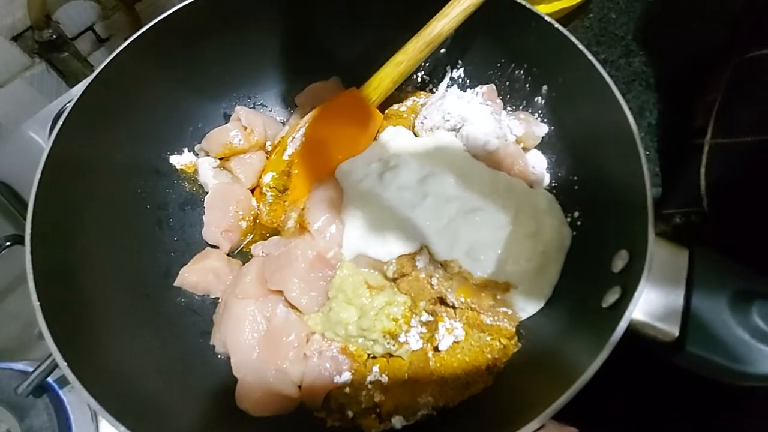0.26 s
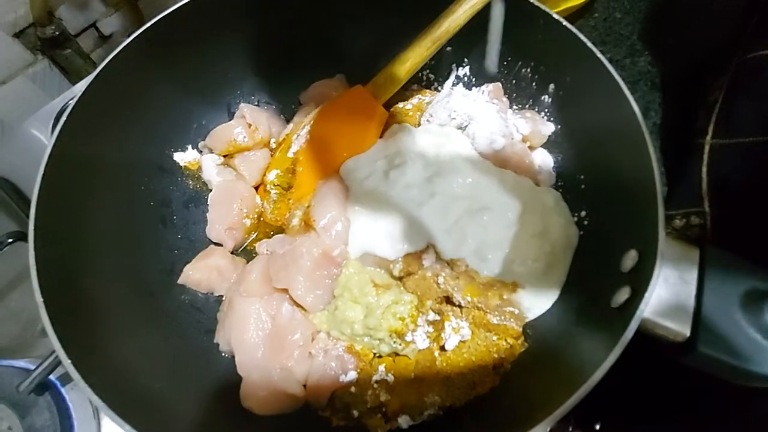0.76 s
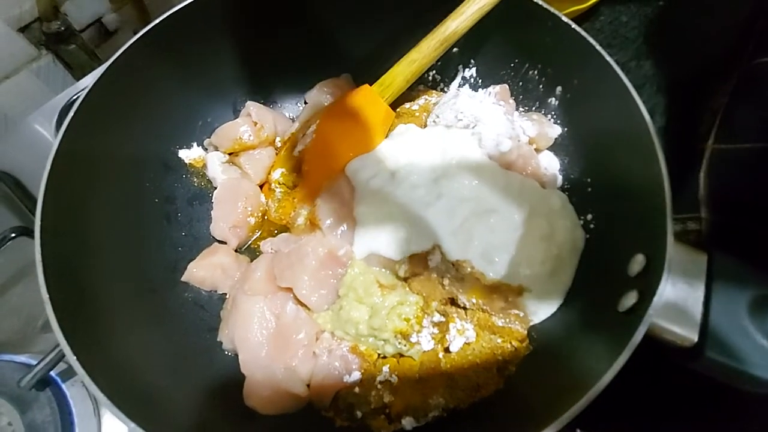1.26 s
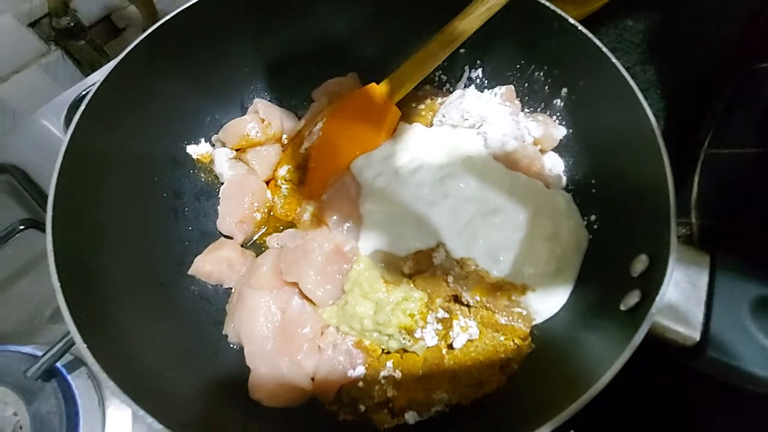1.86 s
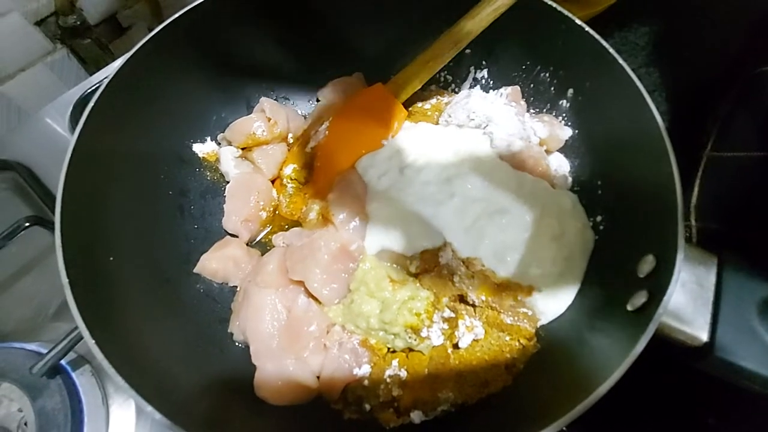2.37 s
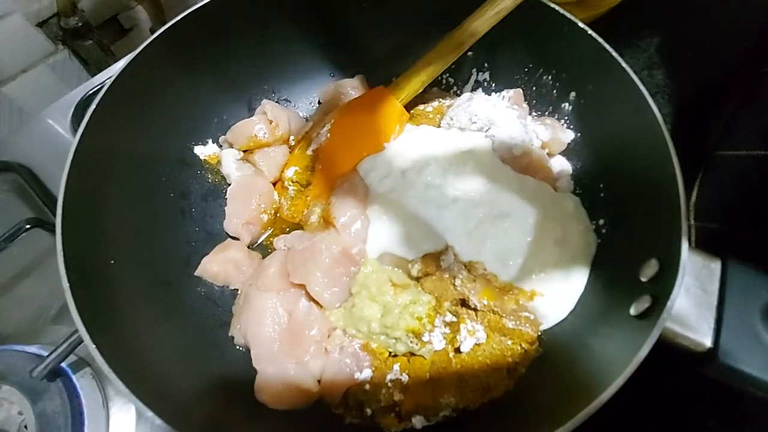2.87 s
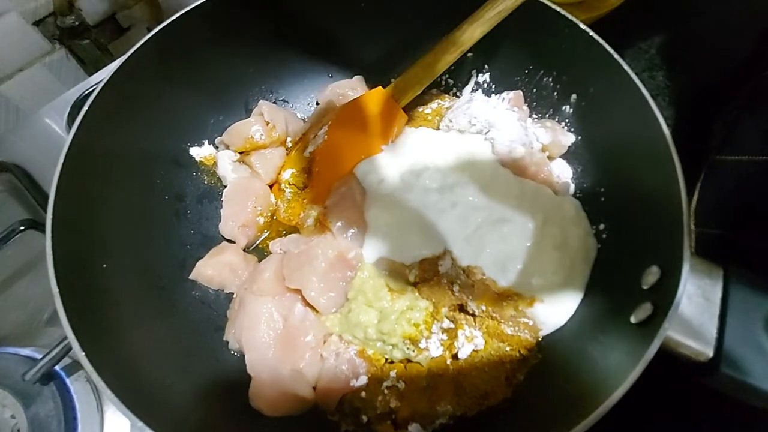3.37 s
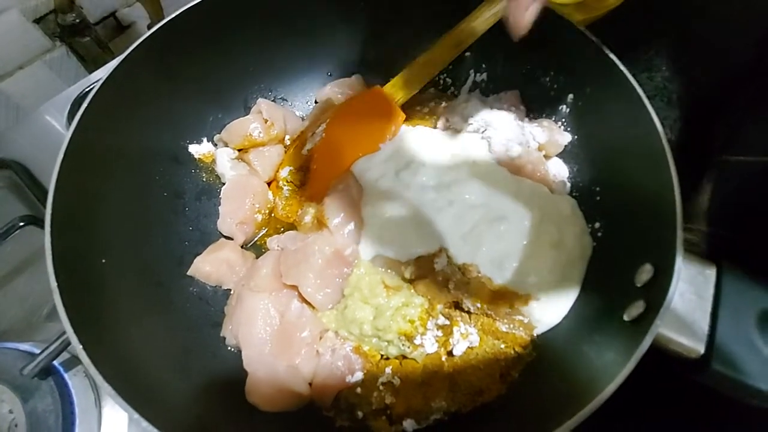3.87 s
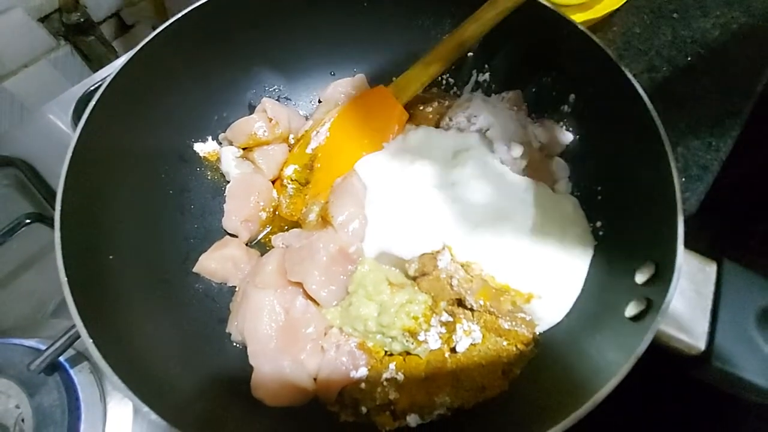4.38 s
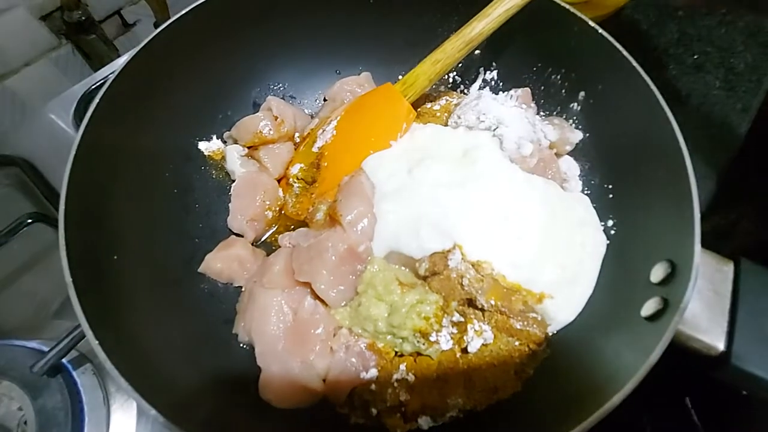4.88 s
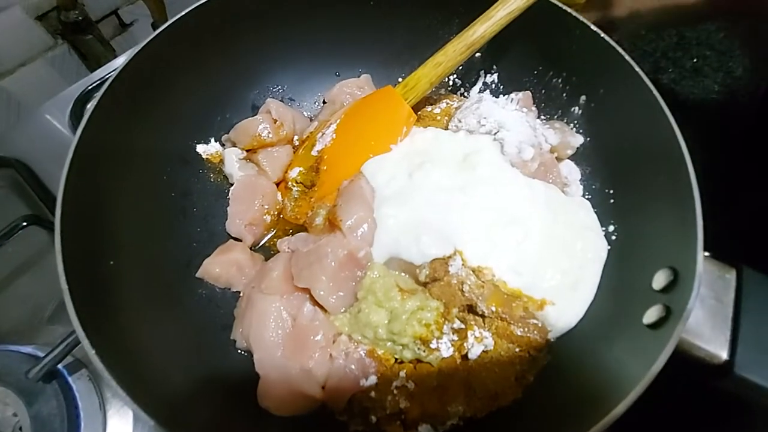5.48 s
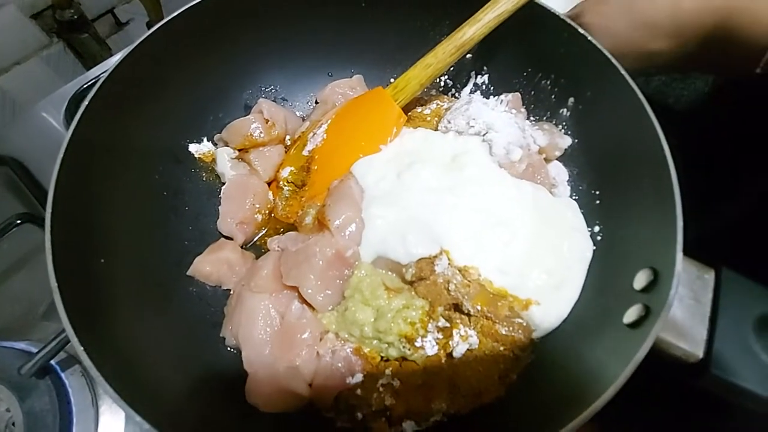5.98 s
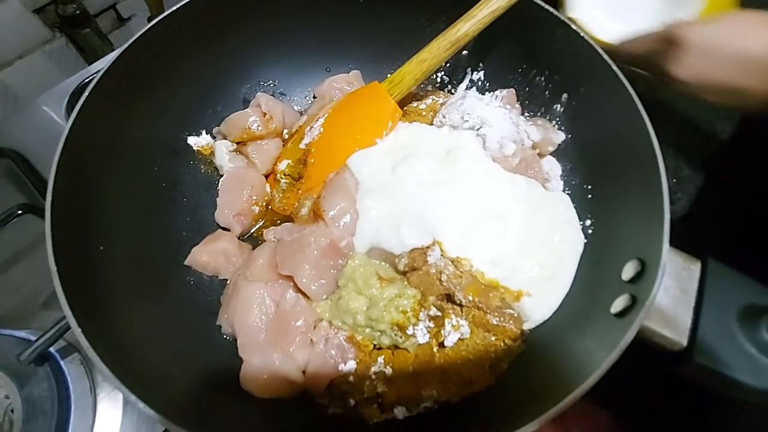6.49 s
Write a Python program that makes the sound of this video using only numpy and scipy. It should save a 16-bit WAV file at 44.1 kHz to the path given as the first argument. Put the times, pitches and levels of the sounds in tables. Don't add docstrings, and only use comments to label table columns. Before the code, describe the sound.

Mostly quiet kitchen handling with faint shuffles, dry rustles and muffled bumps through a stone counter. Midway, a roomy double thud and bright rattle come from a cupboard. A couple of seconds later a light bowl gives a sharp clack, then a dense, very loud flurry of knocks and a brief scrape near the microphone, with wet ticks and dwindling taps. Short hard-room reflections, slight hiss.

```python
import sys
import numpy as np
from scipy import signal
from scipy.fft import rfft, irfft, next_fast_len
from scipy.io import wavfile

SR = 44100
rng = np.random.default_rng(int(sys.argv[2]) if len(sys.argv) > 2 else 0)


def generate_wav(sig):
    pcm = np.round(np.clip(np.atleast_2d(sig).T, -1, 1) * 32767).astype(np.int16)
    wavfile.write(sys.argv[1], SR, pcm)


def ratio_of_db(decibels):
    return 10 ** (np.asarray(decibels, float) / 20)


N = 297407


def at_hz(points, hz):
    table_hz, values = np.transpose(points)
    return np.interp(np.log(hz + 1), np.log(table_hz + 1), values)


def rms_one(x):
    return x / np.sqrt(np.mean(x ** 2) + 1e-30)


def drift(rate_hz, count):
    lowpass = signal.butter(2, rate_hz, fs=SR / 64, output="sos")
    coarse = signal.sosfilt(lowpass, rng.standard_normal((count, N // 64 + 2)))
    return [np.interp(np.arange(N) / 64, np.arange(len(c)), rms_one(c)) for c in coarse]


def swells(rows):
    t = np.arange(0, N + 32, 32) / SR
    s, db, rise_s, fall_s = np.transpose(rows)[:, :, None]
    before = (s - t) / np.maximum(rise_s, 0.002)
    after = (t - s) / np.maximum(fall_s, 0.002)
    level_db = db - 20 * np.where(t < s, before, after)
    return np.interp(np.arange(N) / SR, t, np.sqrt(np.sum(ratio_of_db(level_db) ** 2, axis=0)))


def grains(shape, per_s, spread_db):
    born = rng.random(shape) < per_s / SR
    size_db = spread_db * np.minimum(rng.exponential(1, shape), 4)
    return born * ratio_of_db(size_db) * rng.choice([-1, 1], shape)


def resonance(hz, mode_hz, t60_s):
    r = ratio_of_db(-60 / (t60_s * SR))
    w = 2 * np.pi * mode_hz / SR
    z = np.exp(-2j * np.pi * hz / SR)
    return np.sin(w) * z / (1 - 2 * r * np.cos(w) * z + r * r * z * z)


def causal(spectrum, hz):
    cepstrum = irfft(np.log(ratio_of_db(np.maximum(at_hz(spectrum, hz), -90))))
    half = len(cepstrum) // 2
    fold = np.r_[1, np.full(half - 1, 2), 1, np.zeros(half - 1)]
    return np.exp(rfft(cepstrum * fold))


# (frequency [Hz], correlation [-1..1])
LIKENESS = [(30, .5), (70, .98), (300, .95), (640, .5), (1200, 0.1), (16000, 0)]


def paired(mid, side, hz):
    alike = np.clip(at_hz(LIKENESS, hz), -1, 1)
    return np.sqrt(1 + alike) * mid + np.sqrt(1 - alike) * side * [[1], [-1]]


def stereo_noise(size):
    hz = np.fft.rfftfreq(size, 1 / SR)
    return hz, paired(*rfft(rng.standard_normal((2, size))), hz)


def struck(events, bare, modes, modes_db, per_s, ring_t60_s, pivot_hz):
    size = 16384
    hz, t = np.fft.rfftfreq(size, 1 / SR), np.arange(size // 4) / SR
    rattles = grains((len(events), 2, size // 4), per_s, 2.0)
    luck_db = rng.normal(0, 3.2, (len(events), len(modes)))
    shapes = np.array([ratio_of_db(db) * resonance(hz, mode_hz, t60_s) * (-1) ** k
                       for k, (mode_hz, db, t60_s) in enumerate(modes)])
    colour = causal(bare, hz)
    fade = np.hanning(2 * size)[size:] ** 2
    out = np.zeros((2, N + size))
    for (s, db, tilt_db, rattle_s, ring_hz, ring_db), clicks, strengths_db in zip(events, rattles, luck_db):
        decay = ratio_of_db(-20 * (t / max(rattle_s, 0.001)) ** 1.1)
        push = clicks * np.minimum(t / 0.0023, 1) * decay
        tilt = ((pivot_hz / 8 + 1j * hz) / (8 * pivot_hz + 1j * hz) * 8) ** (tilt_db / 6)
        body = (1 + ratio_of_db(modes_db + strengths_db) @ shapes) * colour * tilt
        ring = resonance(hz, ring_hz, ring_t60_s) * 1j * hz / (ring_hz + 1j * hz) ** 2
        body = body / np.linalg.norm(body) + ratio_of_db(ring_db) * ring / np.linalg.norm(ring)
        hit = irfft(paired(*rfft(push, size), hz) * body) * fade
        at = round(s * SR)
        out[:, at:at + size] += ratio_of_db(db) * hit / np.abs(hit.mean(axis=0)).max()
    return out[:, :N]


# (time [s], peak [dB], push [s], favoured ring [Hz])
BUMPS = [(0.0, -39, 0.088, 330), (0.704, -44, 0.02, 320), (0.751, -44.5, 0.015, 320),
         (1.105, -33, 0.036, 310), (1.16, -40, 0.05, 90), (1.29, -48.5, 0.014, 78.5),
         (1.635, -40, 0.06, 150), (1.696, -36, 0.0042, 175), (1.754, -30, 0.016, 125),
         (2.28, -52, 0.03, 200), (2.614, -47, 0.017, 233), (3.305, -20.5, 0.075, 243),
         (3.34, -24.5, 0.0068, 178), (3.404, -21.5, 0.018, 137), (3.42, -21.5, 0.01, 201),
         (3.497, -41, 0.028, 138), (3.688, -33.5, 0.03, 154), (3.707, -21, 0.02, 142),
         (3.775, -30.5, 0.025, 257), (5.249, -37, 0.058, 403), (5.652, -23.5, 0.094, 320),
         (5.699, -22.5, 0.014, 335), (6.059, -42, 0.014, 514), (6.175, -35, 0.037, 331),
         (6.452, -29, 0.02, 280)]
# (frequency [Hz], level [dB], t60 [s])
COUNTER = [(58, -23.5, 0.35), (125.7, -3, 0.14), (183.8, -3, 0.093), (227.2, -0.5, 0.12), (320, -5.5, 0.24),
           (384.6, -8.5, 0.1), (483, -2, 0.084)]
# (frequency [Hz], density [dB per Hz])
PUSH = [(30, -40), (90, -3.5), (150, -4), (350, -2), (600, -9.5), (1200, -28), (4000, -55), (20000, -101)]


def counter_bumps():
    rows = [(s, db, 2.5 + 10 * np.log2(hz / 255), push_s, hz, -2.5) for s, db, push_s, hz in BUMPS]
    return struck(rows, PUSH, COUNTER, modes_db=-40, per_s=1600, ring_t60_s=0.065, pivot_hz=254)


# (peak time [s], level [dB], rise over 20 dB [s], fall over 20 dB [s])
RUBS = [(0.0, -32, .03, 0.062), (0.158, -56, 0.044, .015), (0.278, -59, .035, 0.011),
        (0.444, -39, 0.087, 0.42), (0.752, -39, 0.026, 0.028), (0.902, -56, 0.13, 0.12),
        (2.87, -54.5, 0.19, 0.34), (5.69, -1, 0.016, 0.09), (5.74, -15, 0.021, 0.15),
        (5.776, -5, 0.078, 0.013), (6.275, -48, 0.027, 0.06), (6.32, -37, 0.06, 0.05),
        (6.405, -36, 0.03, 0.05), (6.368, -31.5, 0.058, 0.2), (6.57, -39, 0.04, 0.031),
        (6.448, -26, .016, 0.042), (6.518, -35, 0.016, 0.085)]
# (frequency [Hz], level [dB], t60 [s])
BOWL = [(640, -21, 0.022), (830, -4.5, 0.02), (1294, 4, 0.036), (1600, 13, 0.0057), (1930, -2, 0.069),
        (2100, 4.5, 0.0047), (2465, -17, 0.22), (2870, -6, 0.045), (3170, -21.5, 0.038), (3483, 6, 0.0088),
        (3950, -27.5, 0.12), (4480, -36, 0.013), (5390, -16, 0.11), (6800, -13, 0.025)]
# (frequency [Hz], density [dB per Hz])
CRACK = [(60, -31), (150, -34), (300, -18), (600, -13.5), (1000, -13.5), (1400, -8.5), (2500, -0.5),
         (4200, -5.5), (5000, -12), (6400, -15.5), (8000, -28.5), (11000, -24.5), (15800, -36.5)]


def rubbing():
    slips_per_s, modes_db, wander_db = 3600, -33, 5.0
    slips = swells(RUBS) * grains((2, N), slips_per_s, 0.71) / np.sqrt(slips_per_s / SR)
    rung = slips + 1e-18
    for (mode_hz, db, t60_s), wander in zip(BOWL, drift(21.8, len(BOWL))):
        r = ratio_of_db(-60 / (0.5 * t60_s * SR))
        w = 2 * np.pi * mode_hz / SR
        drive = slips * ratio_of_db(db + modes_db + wander_db * wander) + 1e-18
        rung = rung + signal.lfilter([0, np.sin(w)], [1, -2 * r * np.cos(w), r * r], drive)
    size = next_fast_len(N)
    hz = np.fft.rfftfreq(size, 1 / SR)
    spectrum = paired(*rfft(rung, size), hz) * ratio_of_db(at_hz(CRACK, hz))
    return ratio_of_db(-8.0) * irfft(spectrum, size)[:, :N]


def flickering(spectrum, flicker_db, count):
    size = next_fast_len(N)
    hz, noise = stereo_noise(size)
    noise = noise * ratio_of_db(at_hz(spectrum, hz))
    inner_hz = np.geomspace(spectrum[1][0], spectrum[-2][0], count + 1)[1:-1]
    edges_hz = np.r_[0, inner_hz, SR]
    patches = 0
    for low, high, own in zip(edges_hz, edges_hz[1:], drift(6.8, count)):
        band = irfft(noise * (hz >= low) * (hz < high), size)[:, :N]
        patches = patches + band * ratio_of_db(flicker_db * own)
    return rms_one(patches)


# (time [s], hiss level [dB])
GATE = [(0.0, -55), (0.4, -54), (0.6, -68.5), (0.92, -70), (1.5, -80), (1.78, -68.5), (1.97, -82.5),
        (2.29, -72.5), (2.42, -82), (2.7, -74), (2.87, -82), (3.5, -72.5), (4.0, -78.5), (4.96, -77.5),
        (5.39, -66), (5.94, -73.5), (6.4, -72), (6.74, -83.5)]
# (peak time [s], rumble level [dB], rise [s], fall [s], air above rumble [dB])
SHUFFLES = [(0.11, -51, 0.12, 0.88, -6), (0.4, -50.5, 0.12, 0.49, -5.5), (0.85, -63.5, 0.11, 0.58, 3),
            (1.16, -59, 0.46, 0.17, -7.5), (1.717, -52, 0.11, 0.34, -7.5), (2.75, -75, 0.32, 1, -25),
            (3.28, -70, .1, 0.044, -16.5), (3.49, -50.5, 0.35, 0.17, -1), (3.799, -52.5, 0.25, 0.1, 1.5),
            (4.3, -64, 0.6, 1, -12), (5.15, -78.5, 1, .3, 5.5), (5.39, -65, 0.26, .5, 7.5),
            (5.831, -50.5, 0.067, 0.078, 10), (5.99, -60, 0.035, 0.061, -25), (6.4, -65, 0.36, 0.074, 15.5)]
# (peak time [s], level [dB], rise [s], fall [s])
RUSTLES = [(0.742, -63.5, 0.0076, 0.056), (0.974, -62.5, .008, 0.054), (1.136, -63, .006, 0.022),
           (1.334, -69.5, 0.0097, 0.035), (1.501, -76, 0.008, 0.15), (1.762, -72, 0.0048, 0.023),
           (2.28, -65.5, 0.14, 0.13), (2.601, -67.5, .02, 0.11), (3.077, -76.5, 0.0064, 0.14),
           (4.029, -84, 0.024, 0.031), (4.09, -86, 0.024, 0.034), (4.336, -67, .01, 0.038),
           (4.568, -73, 0.0074, 0.058), (4.67, -67.5, 0.0088, 0.079), (4.907, -73, 0.0068, 0.075),
           (5.224, -49, 0.0087, 0.11), (5.5, -71.5, 0.24, 0.17), (5.65, -52.5, 0.013, 0.069),
           (5.974, -54, 0.011, 0.068), (6.09, -61, 0.088, 0.1), (6.2, -69, 0.062, 0.13),
           (6.45, -67.5, 0.21, 0.087)]
# (frequency [Hz], density [dB per Hz])
RUMBLE = [(15, -68), (25, -7), (53, -14), (241, -1.5), (357, -2.5), (446, -5), (566, -9), (764, -10.5),
          (1100, -29.5), (1430, -45.5), (2420, -120)]
AIR = [(530, -60), (900, -15), (1000, -8.5), (1170, -5.5), (1630, -2.5), (1960, 0), (2290, -1), (2820, -1),
       (3990, -0.5), (5550, -13.5), (6500, -19), (8450, -40.5), (14300, -120)]
HISS = [(2820, -6), (4800, 2.5), (6110, 0), (8370, -3), (11400, 4.5), (15000, 0), (15900, -17)]
HUM = [(12, -53.5), (20, -22), (38, 1.5), (76, -7.5), (113, -6.5), (130, -9.5), (170, -47), (290, -120)]


def room_floor():
    gate_s, gate_level_db = np.transpose(GATE)
    gate_db = np.interp(np.arange(N) / SR, gate_s, gate_level_db)
    rumble = ratio_of_db(-71.5 + 0.17 * (gate_db + 66.5)) + swells([row[:4] for row in SHUFFLES])
    air_rows = [(s, db + air_db, rise_s, fall_s) for s, db, rise_s, fall_s, air_db in SHUFFLES]
    air = ratio_of_db(-82 + 0.8 * (gate_db + 78.5)) + swells(air_rows)
    hiss = ratio_of_db(gate_db) + swells(RUSTLES)
    return (rumble * flickering(RUMBLE, flicker_db=3.0, count=3)
            + air * flickering(AIR, flicker_db=2.3, count=5)
            + hiss * flickering(HISS, flicker_db=2.3, count=1)
            + ratio_of_db(-68) * flickering(HUM, flicker_db=1.9, count=1))


def bowl_struck(rows):
    return struck(rows, CRACK, BOWL, modes_db=-35, per_s=5000, ring_t60_s=0.016, pivot_hz=2500)


# (time [s], peak [dB], favoured ring [Hz])
NUDGES = [(0.119, -37.5, 3200), (0.163, -36, 3470), (0.285, -39, 3130), (0.382, -35, 3660),
          (0.858, -50, 1720), (0.902, -45, 2120), (0.939, -49, 2400), (1.108, -49, 1110),
          (1.195, -50.5, 4000), (1.655, -53, 3600), (1.685, -47.5, 3350), (1.751, -41.5, 1570),
          (1.85, -56, 3340), (1.878, -48.5, 1170), (1.993, -57.5, 3420), (2.578, -56, 6400),
          (2.777, -68, 3880), (4.317, -53.5, 1720), (4.491, -57, 3700), (4.658, -54.5, 2090),
          (4.93, -57, 4200)]


def nudges():
    return bowl_struck([(s, db, 3 + 12.5 * np.log2(hz / 2500), 0.024, hz, 0.5) for s, db, hz in NUDGES])


# (time [s], peak [dB], frequency [Hz], t60 [s])
RINGS = [(1.108, -40, 312, 0.21), (1.19, -45, 54, 0.3), (0.17, -46, 290, 0.5), (1.753, -36, 185, 0.15),
         (1.752, -47, 1620, 0.04), (3.308, -18, 530, 0.06), (3.318, -27, 1620, 0.07),
         (3.316, -21.5, 1930, 0.05), (3.315, -28.5, 2700, 0.05), (3.314, -27, 3600, 0.09),
         (3.402, -16, 129.7, 0.25), (3.42, -16, 176, 0.13), (3.708, -24, 133, 0.3), (3.73, -27, 186, 0.2),
         (3.735, -35, 423, 0.6), (3.735, -39, 480, 0.3), (3.718, -33, 1711, 0.25), (3.713, -32, 3183, 0.22),
         (3.755, -37, 2880, 0.22), (3.42, -36.5, 3200, 0.1), (5.215, -27, 550, 0.034),
         (5.262, -19, 4176, 0.045), (5.278, -29, 4180, 0.09), (5.305, -36.5, 4200, 0.12),
         (5.426, -24.5, 1300, 0.035), (5.426, -27.5, 1670, 0.04), (5.636, -31.5, 1290, 0.04),
         (5.697, -21, 6400, 0.05), (5.698, -20.5, 730, 0.04), (5.774, -13.5, 2600, 0.05),
         (5.983, -28, 3500, 0.03), (5.655, -30, 330, 0.15), (5.71, -24, 850, 0.06),
         (5.75, -25.5, 760, 0.073), (5.765, -27, 5450, 0.07), (7.2, -43, 280, 0.18),
         (6.455, -35.5, 312, 0.15)]


def rings():
    out, t = np.zeros(N + SR), np.arange(SR // 2) / SR
    for s, db, hz, t60_s in RINGS:
        at = round(s * SR)
        envelope = ratio_of_db(db - 60 * t / t60_s) * np.minimum(t / 0.002, 1)
        out[at:at + len(t)] += envelope * np.sin(2 * np.pi * hz * t)
    return out[:N]


# (time [s], peak [dB], rattle [s], favoured ring [Hz])
TICKS = [(1.935, -63, 0.057, 5900), (2.161, -56, 0.018, 11200), (2.487, -52, 0.023, 11500),
         (2.581, -59, 0.084, 10700), (4.143, -50.5, 0.014, 5300), (4.145, -51, 0.015, 5900),
         (5.31, -37, 0.011, 8900), (5.7325, -20, 0.01, 9100), (5.753, -24.5, 0.028, 11060),
         (5.843, -38.5, 0.03, 8000), (5.636, -43.5, 0.012, 6400)]


def wet_ticks():
    return bowl_struck([(s, db, 15 + 8.5 * np.log2(hz / 10000), rattle_s, hz, -1.5)
                        for s, db, rattle_s, hz in TICKS])


# (time [s], peak [dB], tilt [dB per octave], rattle [s])
THUDS = [
    (3.311, -16.5, -1.5, 0.016),
    (3.316, -16, 1.2, 0.0074),
    (3.416, -21, 2, 0.039),
    (3.687, -47, 2, 0.025),
    (3.707, -30, 3, 0.011),
    (3.712, -21, 4.5, 0.058),
    (3.734, -29.5, -4.5, 0.023),
]
# (frequency [Hz], level [dB], t60 [s])
CUPBOARD = [(474, -22.5, 0.014), (802, -13, 0.0043), (1100, -14, 0.17), (1490, -20, 0.041),
            (1730, -22, 0.11), (2300, -13.5, 0.036), (2290, -16.5, 0.032), (2890, -4.5, 0.042),
            (3160, -2, 0.07), (4000, -25.5, 0.034)]
# (frequency [Hz], density [dB per Hz])
THUD = [(60, -41.5), (150, -5.5), (500, 4), (1000, -0.5), (2000, 0.5), (3200, -11), (4300, -20),
        (5500, -27.5), (8000, -42), (16000, -51)]


def cupboard():
    rows = [(*thud, 530, -18) for thud in THUDS]
    return struck(rows, THUD, CUPBOARD, modes_db=-41, per_s=4100, ring_t60_s=0.022, pivot_hz=1500)


# (time [s], peak [dB], rattle [s], favoured ring [Hz])
KNOCKS = [(5.2132, -24, 0.0064, 2160), (5.2157, -13.5, 0.0068, 3800), (5.222, -17, 0.0092, 3930),
          (5.229, -17.5, 0.0077, 3950), (5.282, -20, 0.011, 2160), (5.346, -26.5, 0.02, 1376),
          (5.4236, -24.5, 0.006, 1500), (5.432, -30, 0.01, 1596), (5.636, -28.5, 0.0092, 1276),
          (5.647, -22, 0.014, 1930), (5.678, -3.5, 0.009, 3295), (5.686, -8, 0.0057, 2500),
          (5.699, -5.5, 0.0075, 2800), (5.704, -11, 0.011, 1880), (5.71, -29, 0.0069, 1787),
          (5.732, -11, 0.017, 2240), (5.754, -10.5, 0.03, 3910), (5.766, -13, 0.015, 2790),
          (5.844, -26.5, 0.0065, 934), (5.96, -29.5, 0.011, 1500), (5.963, -19.5, 0.016, 2740),
          (5.975, -24, 0.012, 2600), (5.984, -25, 0.008, 2000), (5.994, -27, 0.0098, 2500),
          (6.067, -35.5, 0.014, 2040), (6.17, -35, 0.01, 1680), (6.275, -47, 0.0083, 3523),
          (6.357, -31, 0.012, 3900), (6.443, -35, 0.036, 1950), (6.522, -42, 0.018, 2670)]


def knocks():
    rows = []
    for s, db, rattle_s, hz in KNOCKS:
        octaves = np.log2(hz / 2500)
        rows.append((s, db, 8 + 0.79 * db - 0.5 * octaves, rattle_s, hz, -3 - 3 * octaves))
    return bowl_struck(rows)


# (frequency [Hz], t60 [s])
ROOM_T60 = [(100, 0.51), (500, 0.34), (2000, 0.3), (6000, 0.31), (14000, 0.097)]


def kitchen(x, wet_db, gap_s):
    size = 32768
    hz, noise = stereo_noise(size)
    t, tail = np.arange(size) / SR, 0
    for centre_hz in (125, 350, 1000, 2800, 8000, 16000):
        share = np.clip(1 - np.abs(np.log2(hz + 20) - np.log2(centre_hz)) / 1.5, 0, 1)
        tail = tail + irfft(noise * share) * ratio_of_db(-60 * t / at_hz(ROOM_T60, centre_hz))
    tail = tail * np.clip(t / gap_s, 0, 1)
    tail = tail / np.sqrt(np.sum(tail ** 2) / 2)
    return x + ratio_of_db(wet_db) * signal.fftconvolve(x[:1], tail, axes=1)[:, :N]


def scene():
    clean, ring_room_share = rings(), 0.45
    contacts = counter_bumps() + rubbing() + nudges() + wet_ticks() + knocks()
    near = ratio_of_db(-3.5) * kitchen(contacts + ring_room_share * clean, wet_db=-5.5, gap_s=0.0019)
    near = near + ratio_of_db(-2.5) * (1 - ring_room_share) * clean
    far = ratio_of_db(-0.5) * kitchen(cupboard(), wet_db=-1.5, gap_s=0.012)
    return near + far + room_floor()


def roll_off(x):
    return signal.sosfilt(signal.butter(12, 15700, fs=SR, output="sos"), x)


# (frequency [Hz], left minus right [dB])
LEAN = [(40, -11.5), (99, -4), (160, 0.5), (270, -3.5), (450, -1), (740, 6), (1220, 1), (2010, -6),
        (3330, -11.5), (5500, 4.5), (9080, 16.5), (15000, 9.5)]
# (frequency [Hz], level [dB], t60 [s])
PORT_RING = (4083, 2, 0.0055)


def record(dry):
    size = next_fast_len(N + 4096)
    hz = np.fft.rfftfreq(size, 1 / SR)
    lean = ratio_of_db(at_hz(LEAN, hz) / 2 * np.array([[1], [-1]]))
    colour = lean * (1j * hz / (70 + 1j * hz)) ** 2
    ring_hz, ring_db, t60_s = PORT_RING
    ring = resonance(hz, ring_hz, t60_s) * 1j * hz / ring_hz
    colour[1] *= 1 + ratio_of_db(ring_db) * ring / np.abs(ring).max()
    ports = irfft(rfft(dry, size) * colour, size)[:, :N]
    ceiling = 1.1
    return roll_off(ceiling * np.tanh(ports / ceiling))


dry = scene()
out = record(dry)
generate_wav(out)
```